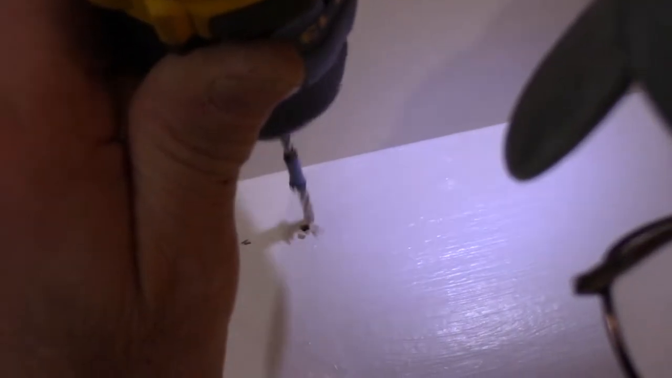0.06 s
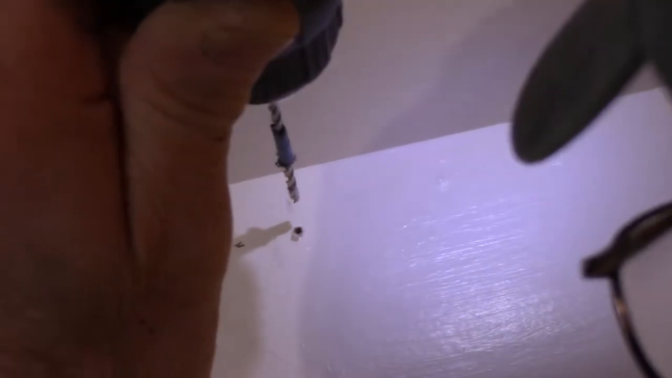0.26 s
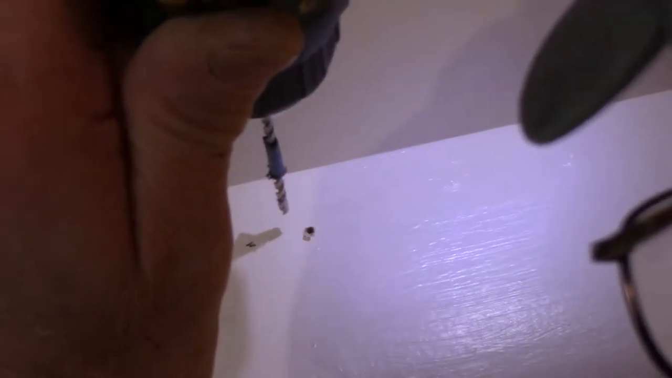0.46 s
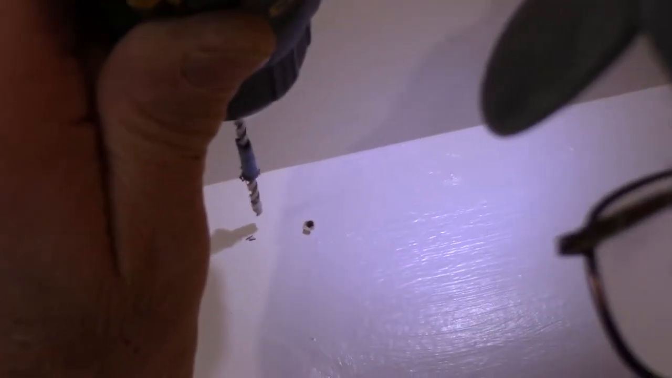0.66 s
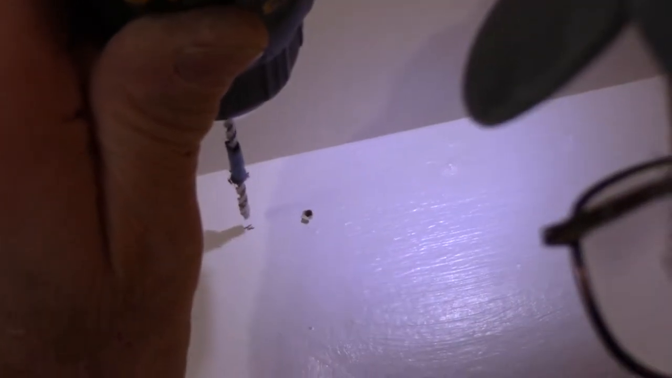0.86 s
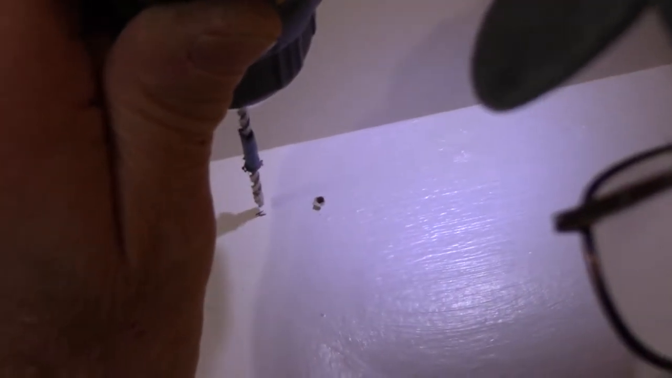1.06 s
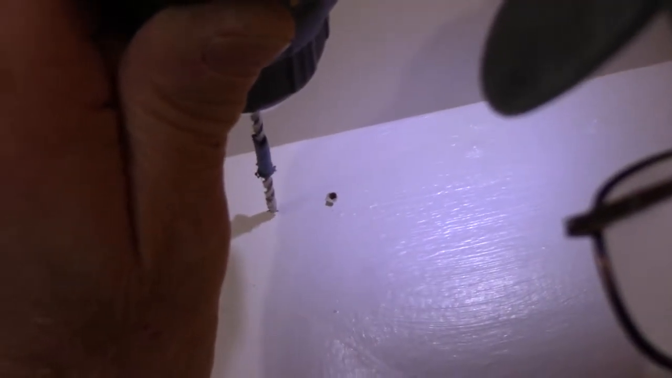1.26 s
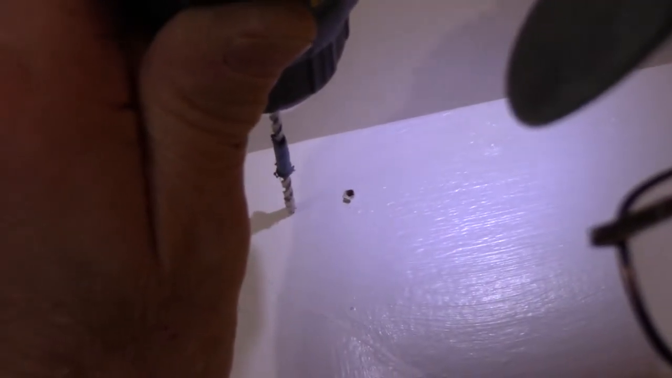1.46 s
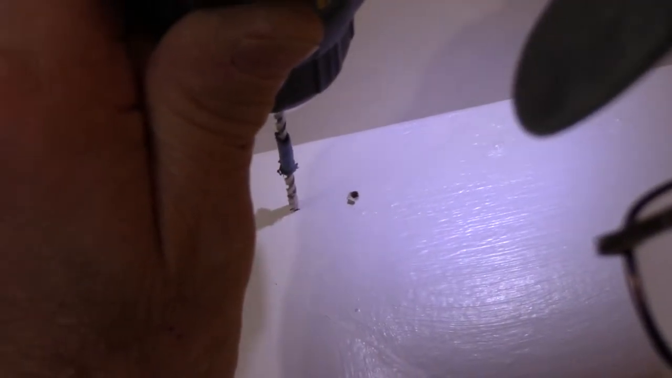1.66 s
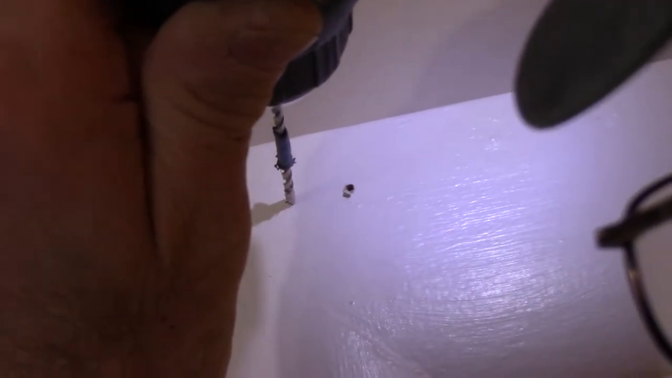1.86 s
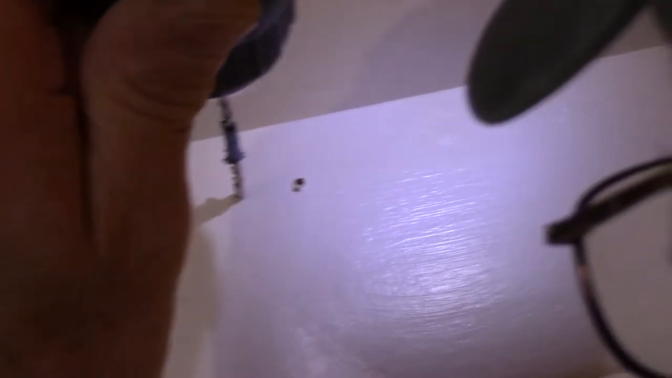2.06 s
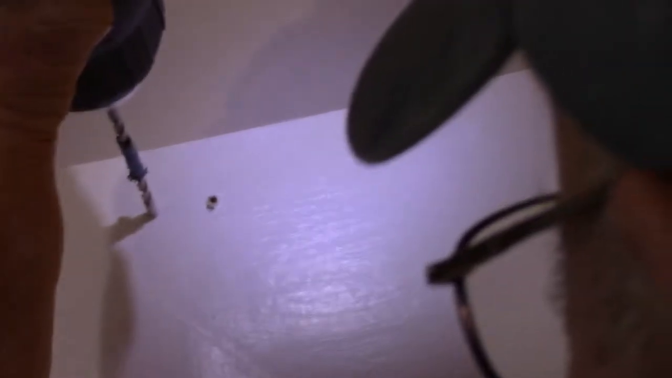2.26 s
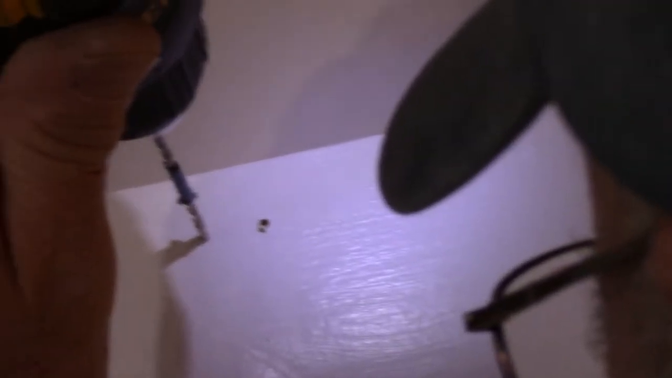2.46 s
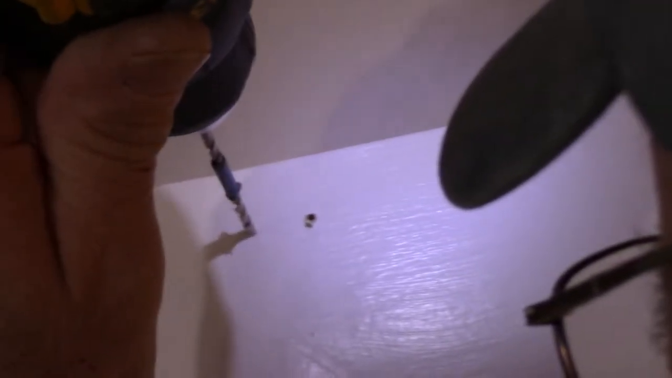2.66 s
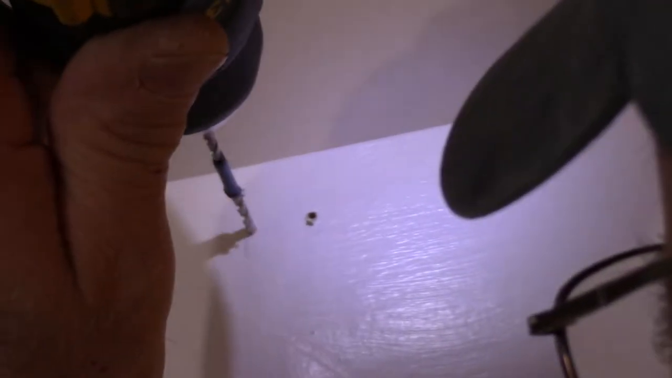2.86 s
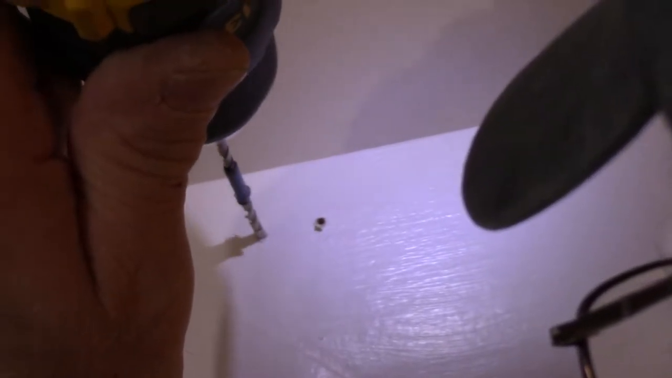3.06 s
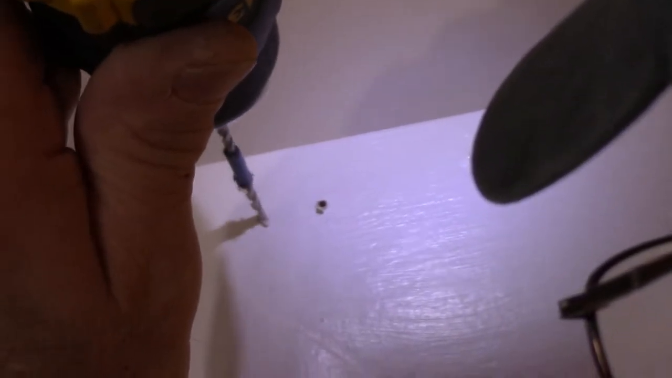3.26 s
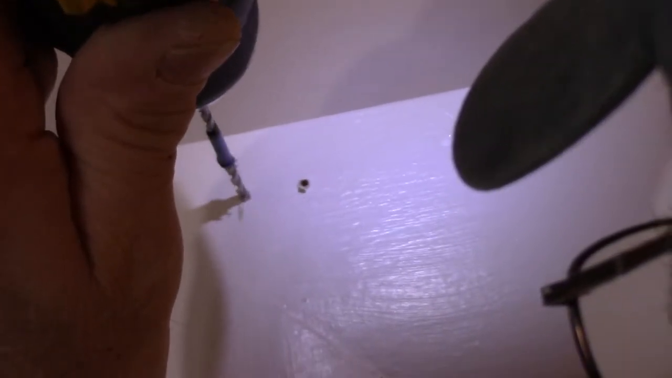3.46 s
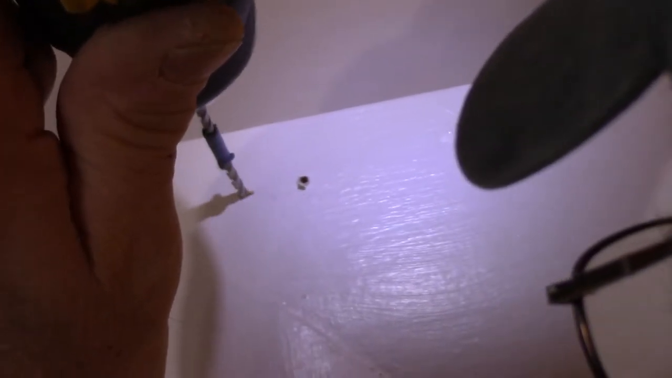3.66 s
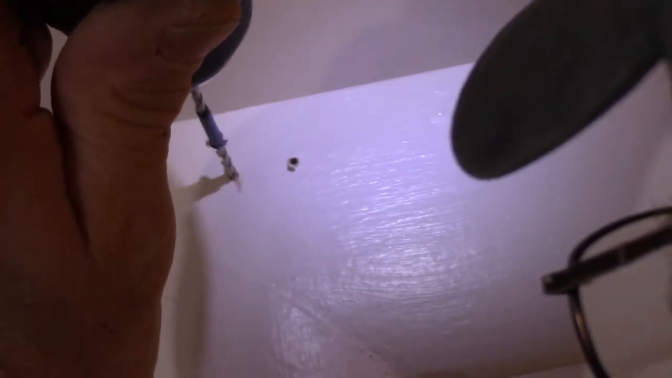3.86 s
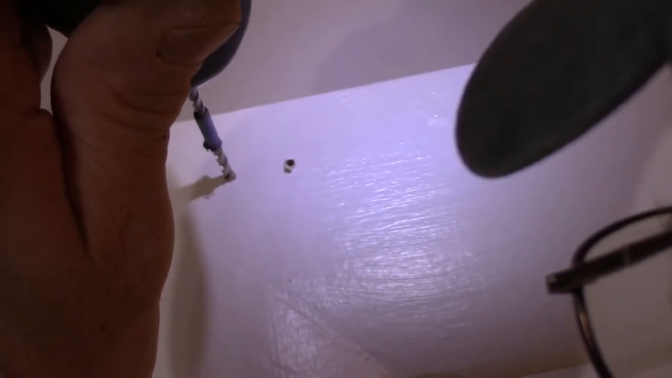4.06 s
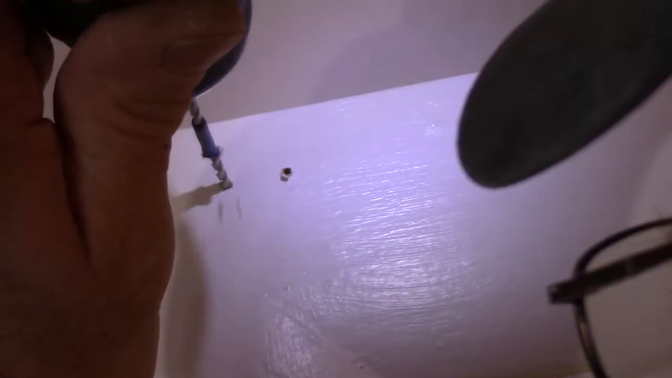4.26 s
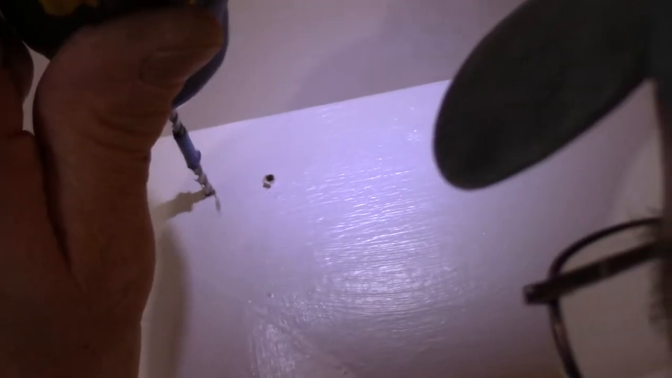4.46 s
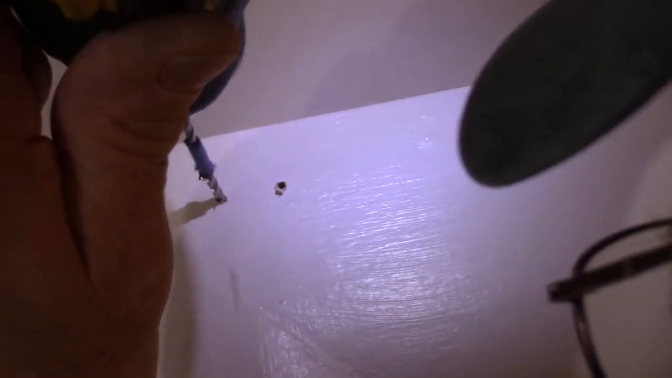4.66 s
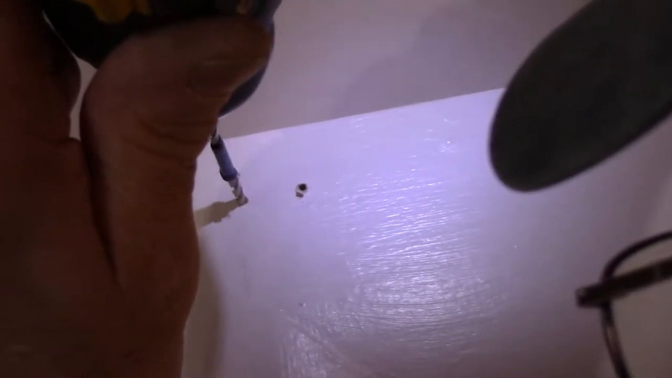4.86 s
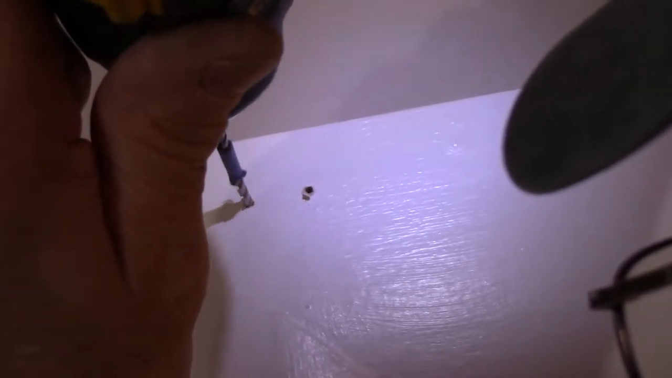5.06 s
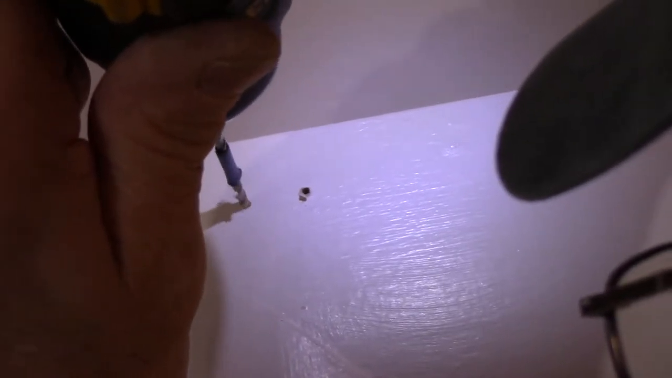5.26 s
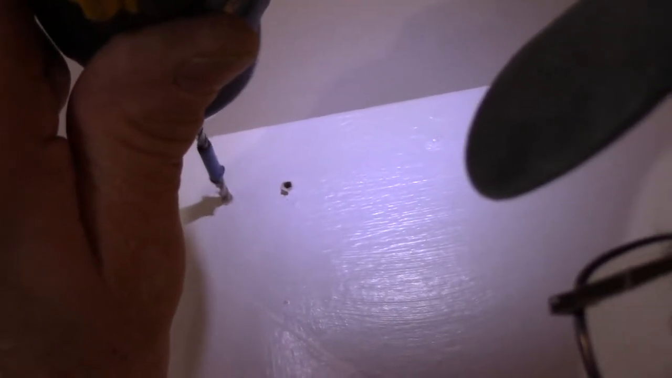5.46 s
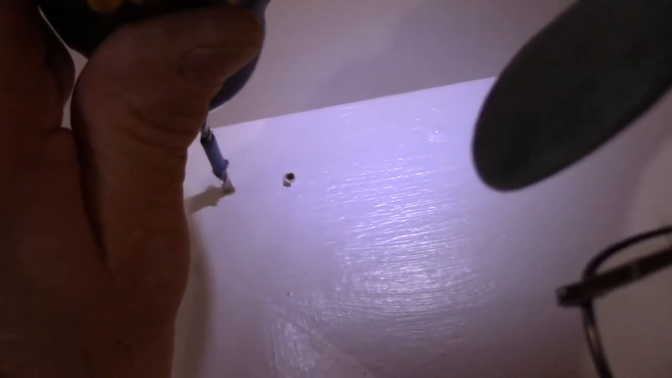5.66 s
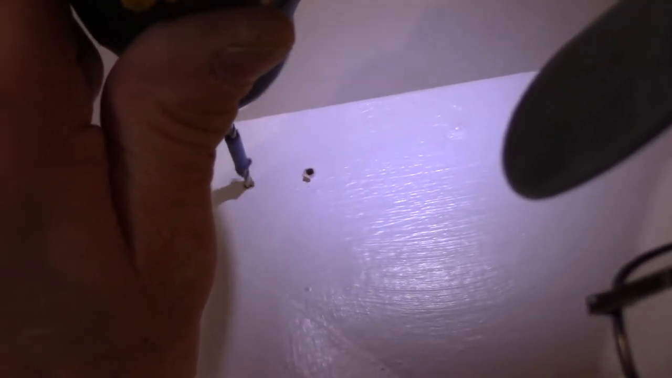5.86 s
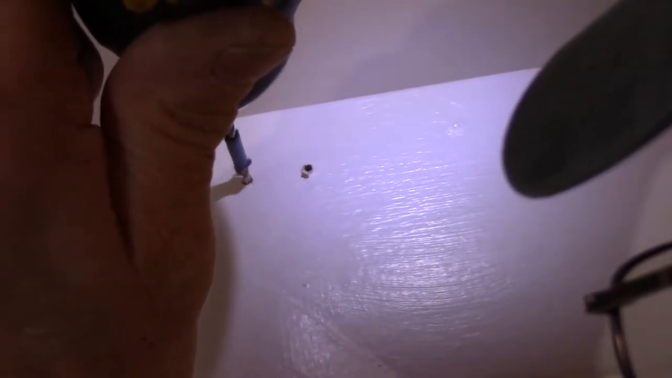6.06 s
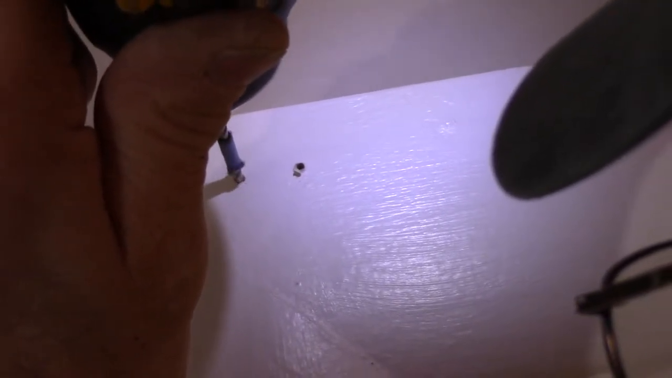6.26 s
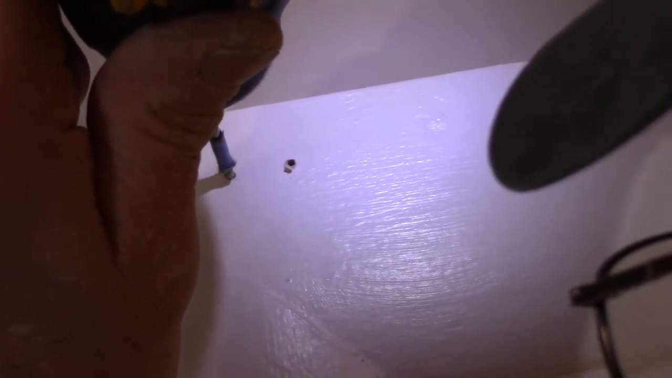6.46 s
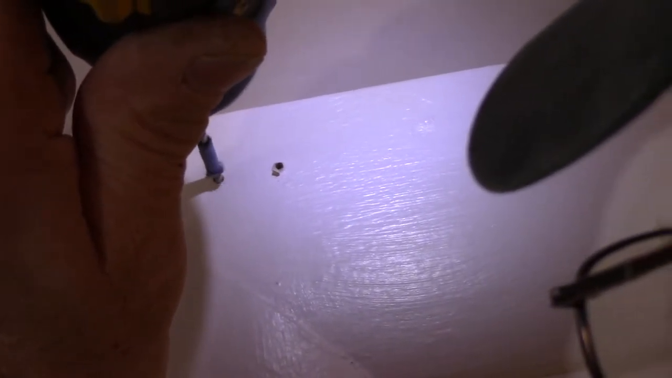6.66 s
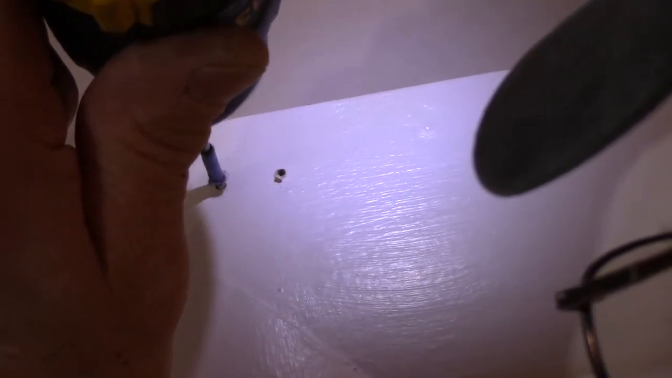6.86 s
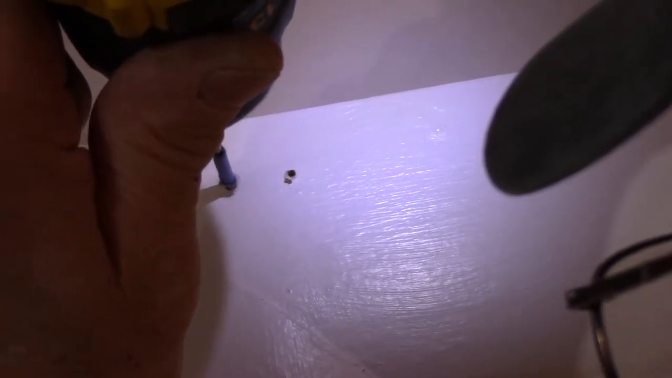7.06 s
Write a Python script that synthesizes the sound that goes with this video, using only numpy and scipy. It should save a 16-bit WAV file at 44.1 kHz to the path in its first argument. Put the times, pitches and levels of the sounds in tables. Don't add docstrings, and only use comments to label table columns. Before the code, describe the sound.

A cordless drill close to a camera microphone in a small room is already whining loudly, then at once brakes with a sharp clack. A quiet pause of soft hiss and low hand rumble follows. The trigger clicks, the motor growls low, rises in steps to a steady rough whine, then jumps to a higher, brighter one while the bit grinds on to the end.

```python
import sys
import numpy as np
from scipy import signal
from scipy.fft import rfft, irfft, next_fast_len
from scipy.io import wavfile
from scipy.ndimage import uniform_filter1d, minimum_filter1d, map_coordinates

SR = 44100
rng = np.random.default_rng(int(sys.argv[2]) if len(sys.argv) > 2 else 0)


def dump(signal):
    limited = np.clip(np.atleast_2d(signal).T, -1, 1)
    pcm = np.round(limited * 32767).astype(np.int16)
    wavfile.write(sys.argv[1], SR, pcm)


def volts_from_decibels(level):
    exponent = np.asarray(level, float) / 20
    return 10 ** exponent


N = 313551

# (multiple of rotor speed, level [dB rms])
FIRST_HOLE_ORDERS = [(2, -33.5), (3, -32.5), (4, -22), (5, -30.5), (6, -17.5), (11, -40), (14, -31),
                     (16, -30)]


def rotor():
    rotor_hz, brake_s = 267.5, 0.15
    angle = shaft(np.full(N, rotor_hz), jitter=0.0026)
    fade_db = 1.6 * curves(EFFORT[0][:2])[0]
    whine = sum(order(k, angle, db + fade_db, flutter_db=1.7) for k, db in FIRST_HOLE_ORDERS)
    first = span([(0,), (brake_s,)], fade=0.0085) * np.array([whine, beating(angle)])
    return first + span(EFFORT[1], fade=0.0079) * second_hole(speed())


# (multiple of rotor speed, level at middle speed [dB rms],
# level at full speed [dB rms], loss per Hz that the load drags the rotor [dB/Hz])
STEADY_ORDERS = [(1, -32.5, -29.5, .05), (2, -61, -34, -2), (3, -31.5, -24, 0.5), (4, -18.5, -16, 1.94),
                 (5, -21.5, -33, 1.8), (6, -41, -33, -1), (7, -36.5, -35, -3), (8, -24, -42.5, 0.6)]
# (loaded [Hz], usual [Hz], free [Hz])
SAG_HZ = (198, 200.5, 203)
# (multiple of rotor speed, resonance [Hz], width [Hz], level at its top
# [dB rms])
CROSSINGS = [(2, 356.3, 25, -29), (3, 350, 22, -24), (4, 351, 25, -28), (4, 640, 150, -21.5),
             (4, 768, 40, -15), (5, 925, 170, -28), (6, 994, 200, -19), (7, 920, 190, -27),
             (8, 1160, 130, -16.5), (12, 796, 200, -20.5), (12, 1030, 81, -14), (12, 1210, 180, -11.5),
             (12, 1620, 380, -17.5), (16, 840, 180, -28), (16, 1115, 260, -16.5), (16, 1400, 95, -27.5),
             (16, 1680, 260, -16.5), (16, 3230, 70, -35), (16, 3700, 139, -21), (16, 3714, 259, -12),
             (16, 4092, 320, -4), (16, 4600, 111.4, -21.5), (20, 4020, 300, -24), (20, 4200, 78, -11),
             (21, 4200, 300, -27), (14, 4050, 160, -22), (22, 3800, 300, -23), (22, 4180, 200, -16.5),
             (22, 4380, 100, -25.5)]
# (multiple of rotor speed, resonance [Hz], width [Hz], level at its top [dB rms])
FLARES = [(21, 1680, 91, -17), (19, 1680, 100, -29), (13, 1650, 140, -14), (14, 1690, 140, -16),
          (52, 3190, 150, -25), (26, 2940, 140, -20), (54, 4000, 290, -20), (67.7, 4100, 300, -19),
          (43, 4250, 270, -14), (40, 3900, 360, -12), (32, 4180, 220, -12), (27, 4200, 300, -12),
          (11, 2010, 150, -24)]


def second_hole(hz):
    angle = shaft(hz, jitter=0.0013)
    full = fullness(hz)
    loaded_hz, usual_hz, free_hz = SAG_HZ
    unloaded_hz = (1 - full) * (np.clip(hz, loaded_hz, free_hz) - usual_hz)
    asleep_db = 0.25 * np.minimum(hz - 190, 0)

    power = {}
    for k, middle_db, full_db, gain_per_hz in STEADY_ORDERS:
        hollow_db = -14 * inside(round(k) * hz, 935, 70)
        steady_db = middle_db + full * (full_db - middle_db) + gain_per_hz * unloaded_hz
        power[round(k)] = volts_from_decibels(steady_db + asleep_db + hollow_db) ** 2
    for k, centre_hz, width_hz, db in CROSSINGS:
        ring = volts_from_decibels(db) * inside(round(k) * hz, centre_hz, width_hz)
        power[round(k)] = power.get(round(k), 0) + ring ** 2

    loose = np.clip(190 / hz - 0.9, 0, 1)
    backlash = 0.045 * loose
    whine = np.zeros(N)
    for k, p in power.items():
        smeared = angle + 0.5 * backlash * wobble(150)
        breakup_db = 2.5 * loose * wobble(50)
        whine += np.sqrt(p) * order(k, smeared, breakup_db, flutter_db=0.45)
    for k, centre_hz, width_hz, db in FLARES:
        tooth = order(k, angle + backlash * wobble(250), db, flutter_db=2.8)
        whine += tooth * inside(round(k) * hz, centre_hz, width_hz)
    return np.array([whine, beating(angle)])


# (time [s], speed [Hz])
TRIGGER = [(2.384, 29.05), (2.561, 91.2), (2.769, 89.6), (2.777, 133.6), (2.814, 114.5), (2.905, 134.8),
           (2.915, 148.8), (2.948, 153), (2.951, 207), (3.5, 202), (4.0, 199.2), (5.125, 198.4),
           (5.145, 289.9), (5.7, 286.8), (6.1, 288.4), (7.11, 286)]


def speed():
    lag_s, lag_power = 0.026, 1.37
    lag = (1 + np.arange(SR) / SR / lag_s) ** -(lag_power + 1)
    asked = np.pad(curves(TRIGGER)[0], (SR, 0), "edge")
    return signal.fftconvolve(asked, lag / lag.sum())[SR:SR + N]


def fullness(hz):
    return np.clip((hz - 220) / (270 - 220), 0, 1)


def shaft(hz, jitter):
    return 2 * np.pi * np.cumsum(hz * (1 + jitter * wobble(45))) / SR


def order(k, angle, db, flutter_db):
    tone = np.sin(round(k) * angle + rng.uniform(0, 2 * np.pi))
    return np.sqrt(2) * volts_from_decibels(db + flutter_db * wobble(22)) * tone


def inside(hz, centre_hz, width_hz):
    return 1 / (1 + (2 * (hz - centre_hz) / width_hz) ** 2)


def beating(angle):
    return 0.043 * np.sin(angle) + 0.15 * np.sin(2 * angle)


# (frequency [Hz], level [dB per Hz])
MIDDLE_BODY = [(60, -50), (100, -17), (200, -20), (520, -22), (600, -13), (800, -11), (1020, -8.5),
               (1330, -10), (2100, -10.5), (3500, -11), (4550, -39), (7700, -120)]
FULL_BODY = [(59, -59), (100, -32.5), (237, -21), (283, -27), (506, -18), (852, -7.5), (1060, -5),
             (1130, -5.5), (1350, -11.5), (3500, -15.5), (4550, -45), (7700, -120)]
GEAR_HISS = [(1470, -30.5), (2500, -15.5), (3260, -9.5), (3960, -3.5), (4570, -3.5), (5440, 1), (6480, -8),
             (8500, -15), (11000, -50), (18700, -120)]
GEAR_TOP = [(4120, -20), (7000, -1), (7320, -6), (8380, -4.5), (9410, -1), (10000, -7.5), (12200, -20.5),
            (13400, -25), (14800, -17), (15800, -36)]
# (frequency [Hz], width [Hz], lift at middle speed [dB], lift at full speed [dB])
CASING = [(205, 31, 7.5, 13), (353.4, 20, 10, 10), (1690, 118, 7.5, 5), (2365, 27, 4, -11),
          (2850, 75, 5.5, 1), (3000, 30, 8, 7), (3584, 100, 4, 8.5), (3824, 37, 7.5, 9.5),
          (4046, 580, 3.5, 6), (4815, 150, 1.5, 9.5), (5154, 42, 9, 4.5), (5420, 91, 2, 5.5),
          (5820, 110, 6, -8), (6080, 240, 1, 7), (6700, 160, 4.5, 2), (9100, 190, 5, 0),
          (9370, 160, 7.5, 0), (14700, 900, 3.5, -4), (10940, 900, 3, 0.5)]


def gears(beat):
    hz = np.fft.rfftfreq(next_fast_len(N + 8192), 1 / SR)
    middle_lift, full_lift = casing_lift(hz, column=2), casing_lift(hz, column=3)
    full = fullness(speed())
    shake_db = 0.33 * wobble(9.6)
    colours = [(MIDDLE_BODY, FULL_BODY), (GEAR_HISS, GEAR_HISS), (GEAR_TOP, GEAR_TOP)]
    out = np.zeros(N)
    for gain, (middle_colour, full_colour) in zip(gear_levels(), colours):
        teeth = patchy(depth_db=0.63) * (1 + beat) * volts_from_decibels(0.73 * wobble(300))
        slow = unit(filtered(teeth, lambda f: volts_from_decibels(along(middle_colour, f)) * middle_lift))
        quick = unit(filtered(teeth, lambda f: volts_from_decibels(along(full_colour, f)) * full_lift))
        out += gain * volts_from_decibels(shake_db + 0.45 * wobble(18)) * ((1 - full) * slow + full * quick)
    return out


def casing_lift(hz, column):
    power = 1
    for mode in CASING:
        power = power + (volts_from_decibels(mode[column]) ** 2 - 1) * inside(hz, mode[0], mode[1]) ** 2
    return np.sqrt(power)


# (time [s], effort [dB])
EFFORT = [
    [(0.0, 0), (0.138, -1), (0.147, -3), (0.151, 7), (0.169, -10), (0.179, -8), (0.36, -13)],
    [(2.42, -20), (2.43, -6), (2.45, -11.5), (2.54, -2), (2.75, 0), (2.78, 3), (2.87, 3), (3.2, 2),
     (3.3, -0.5), (3.6, 0.5), (4.2, -0.6), (5.1, -0.3), (5.16, 4), (5.19, -1.1), (5.3, 0.2), (6.3, -0.3),
     (7.11, -1.5)],
]
# (level [dB rms], gain per dB of effort [dB/dB])
GEAR_LAYERS = [
    (-18.5, 0.52),
    (-17.5, 0.94),
    (-29, 0.9),
]
# (time [s], level [dB], t60 [s])
TREBLE_BURSTS = [
    (0.149, -18, 0.052),
    (2.424, -40, 0.044),
    (5.15, -43, 0.13),
]


def gear_levels():
    t = np.arange(N) / SR
    coast = np.where(t < 1, volts_from_decibels(-260 * np.maximum(t - 0.19, 0)), 1)
    levels = []
    for db, slope in GEAR_LAYERS:
        runs = [span(rows, fade=0.0022) * volts_from_decibels(db + slope * curves(rows)[0]) for rows in EFFORT]
        levels.append(coast * sum(runs))
    for s, db, t60 in TREBLE_BURSTS:
        levels[-1] = levels[-1] + (t > s) * volts_from_decibels(db - 60 * np.abs(t - s) / t60)
    return levels


# (time [s], peak [dB], ring [Hz], t60 [s], crack share of ring)
CLACKS = [(0.150, -5, 2940, 0.024, 1.7), (0.154, -9, 1650, .04, 0.37), (0.155, -5.5, 1088, 0.049, 0.35),
          (0.172, -8, 2750, 0.051, .6), (0.205, -27, 2660, 0.24, .05), (0.21, -35, 1510, .18, .05),
          (1.416, -31, 274, 0.13, .02), (2.157, -41.5, 1650, .06, 3.8), (2.345, -40, 1000, 0.08, 1.2),
          (2.4242, -17, 1720, 0.057, 0.73), (2.425, -23, 793, 0.043, .3), (2.4255, -15, 3040, .03, 0.64),
          (2.4265, -1, 3810, 0.016, 0.54), (2.429, -2, 4270, 0.019, 0.37), (2.436, -19, 3840, .02, .3),
          (2.4412, -3, 4220, 0.014, 0.33), (2.767, -3, 4160, .06, .4), (5.121, -11, 3020, 0.052, .2)]


def clacks():
    out, t = np.zeros(N + SR), np.arange(SR // 4) / SR
    for s, db, hz, t60, share in CLACKS:
        rough = np.cumsum(rng.standard_normal(len(t))) * 0.084
        ring = np.sin(2 * np.pi * hz * t + rough) * (1 - np.exp(-t / 0.00013))
        crack = share * uniform_filter1d(rng.standard_normal(len(t)), size=3)
        out[round(s * SR):][:len(t)] += volts_from_decibels(db - 60 * t / t60) * (ring + crack)
    return filtered(out[:N], lambda f: 1 / (1 + 1j * f / 6500) ** 4)


# (frequency [Hz], t60 [s])
ROOM = [(300, 0.39), (2000, 0.27), (10000, 0.12)]


def room(x):
    hz, t, z = signal.stft(rng.standard_normal(SR // 2), SR, nperseg=256)
    decay = volts_from_decibels(-60 * t / along(ROOM, hz)[:, None])
    tail = signal.istft(z * decay, SR, nperseg=256)[1]
    delayed = np.pad(x, (200, 0))
    return signal.fftconvolve(delayed, tail / np.linalg.norm(tail))[:N]


# (frequency [Hz], level [dB per Hz])
RUMBLE = [(11, -23), (18, -2), (48, -2.5), (65, -4), (90, -20), (120, -36), (200, -120)]
THUMP = [(70, -27), (90, -1), (122, 3), (145, -13), (270, -11), (520, -30), (1200, -30), (2500, -70)]
PREAMP = [(240, -33), (400, -3.5), (528, -4.5), (579, -3), (1010, -9), (8150, -13.5), (15800, -17)]


def background():
    deep_gain, thump_gain = np.abs(grips())
    deep = unit(filtered(rng.standard_normal(N), lambda f: volts_from_decibels(along(RUMBLE, f))))
    lumps = volts_from_decibels(0.42 * wobble(18)) * rng.standard_normal(N)
    thump = unit(filtered(lumps, lambda f: volts_from_decibels(along(THUMP, f))))
    hiss = unit(filtered(rng.standard_normal(N), lambda f: volts_from_decibels(along(PREAMP, f))))
    return deep_gain * deep + thump_gain * thump + volts_from_decibels(-45.5) * hiss


# (time [s], length [s], deep level [dB], thump level [dB])
GRIPS = [(0.167, 0.25, -28, -36), (0.45, .3, -33, -39), (0.876, 0.038, -34, -39), (1.08, 0.073, -31, -38),
         (1.457, 0.15, -32.5, -36.5), (1.63, 0.14, -30, -40), (1.87, 0.15, -27, -38),
         (2.09, 0.1, -34.5, -36), (2.333, 0.28, -32, -40.5), (2.492, 0.083, -42, -26),
         (2.75, 0.46, -25, -32.5), (3.072, 0.045, -30, -31), (3.42, 0.24, -35, -38),
         (3.86, 0.38, -30.5, -36), (4.13, .12, -31, -39), (4.389, .06, -29, -33), (4.794, 0.28, -35, -40.5),
         (5.055, .06, -29, -39), (5.6, .2, -34, -43), (5.8, .1, -38, -38), (6.03, 0.099, -37, -38)]


def grips():
    t = np.arange(N) / SR
    still_db = np.array([-38, -42])
    tremble_db = np.array([wobble(9), wobble(9)])
    gains = volts_from_decibels(still_db[:, None] + tremble_db)
    for s, length, *dbs in GRIPS:
        swell = np.exp(-(2 * (t - s) / length) ** 2)
        gains = gains + np.outer(volts_from_decibels(dbs) - volts_from_decibels(still_db), swell)
    return gains


def unit(x):
    return x / np.sqrt(np.mean(x ** 2) + 1e-20)


def along(points, hz):
    f, v = np.transpose(points)
    return np.interp(np.log(hz + 1), np.log(f + 1), v)


def curves(rows):
    s, *cols = np.transpose(rows)
    return [np.interp(np.arange(N) / SR, s, c) for c in cols]


def span(rows, fade):
    t = np.arange(N) / SR
    rise = np.clip((t - rows[0][0]) / fade + 1, 0, 1)
    fall = np.clip((rows[-1][0] - t) / fade + 1, 0, 1)
    return rise * fall


def wobble(rate):
    coarse = np.arange(0, N + 16, 16)
    knots = rng.standard_normal(int(N * rate / SR) + 4)
    return np.interp(np.arange(N), coarse, map_coordinates(knots, [coarse * rate / SR]))


def filtered(x, response):
    m = next_fast_len(N + 8192)
    return irfft(rfft(x, m) * response(np.fft.rfftfreq(m, 1 / SR)), m)[..., :N]


def patchy(depth_db):
    z = signal.stft(rng.standard_normal(N), nperseg=512)[2]
    field = uniform_filter1d(rng.standard_normal(z.shape), size=4, axis=0)
    field = uniform_filter1d(field, size=8, axis=1)
    return signal.istft(z * volts_from_decibels(depth_db * unit(field)), nperseg=512)[1][:N]


def scene():
    whine, beat = rotor()
    knocks = clacks()
    echo = room(volts_from_decibels(-23) * whine + volts_from_decibels(-11) * knocks)
    return (whine + knocks + echo + gears(beat) + background())[None]


def low_pass(x):
    return signal.sosfilt(signal.butter(12, 16670, fs=SR, output="sos"), x)


def record(dry):
    needed = np.minimum(1, 0.96 / (np.abs(dry) + 1e-9))
    gain = uniform_filter1d(minimum_filter1d(needed, size=161), size=81)
    mix = filtered(dry * gain, lambda f: f < 15750)
    return low_pass(mix)


dry = scene()
out = record(dry)
dump(out)
```